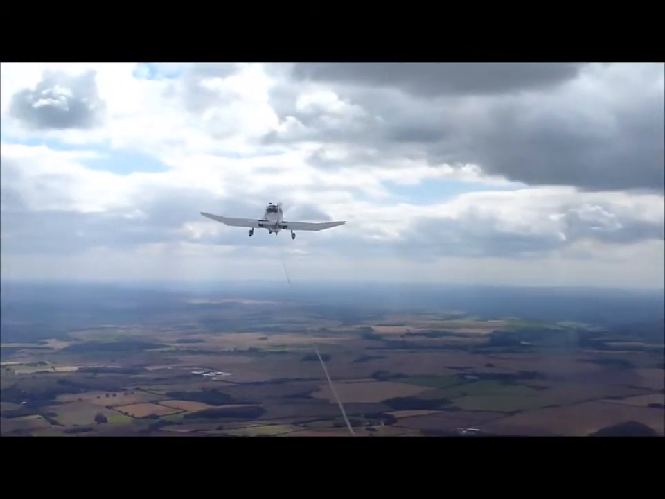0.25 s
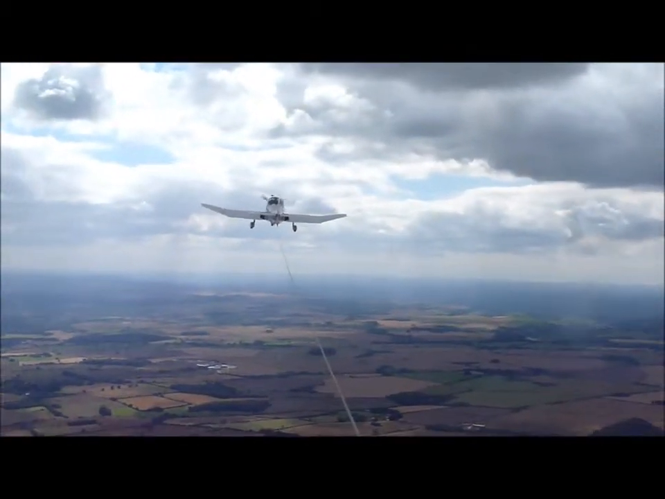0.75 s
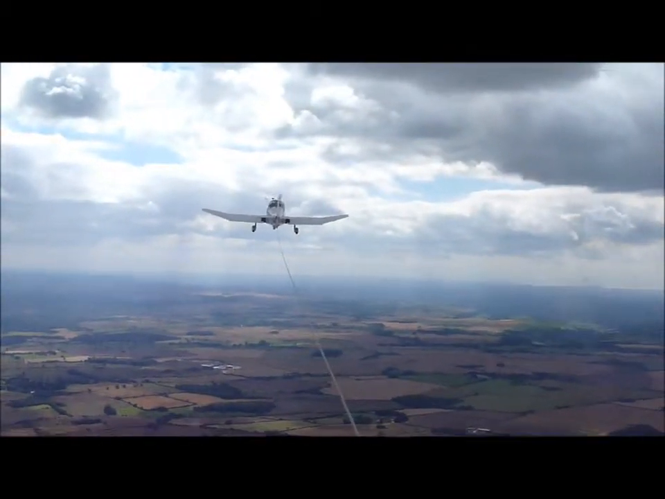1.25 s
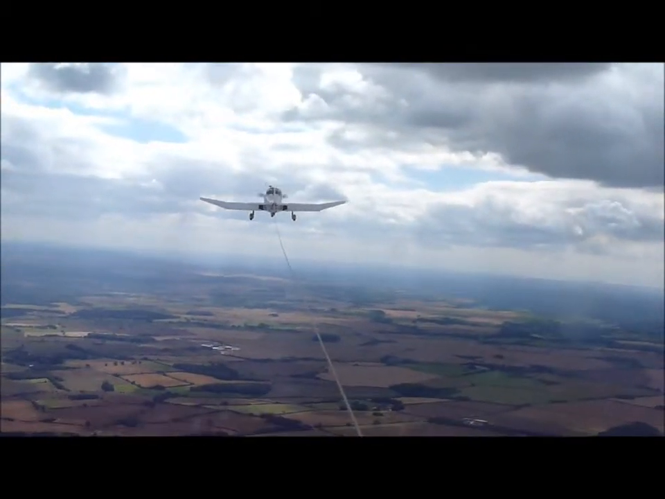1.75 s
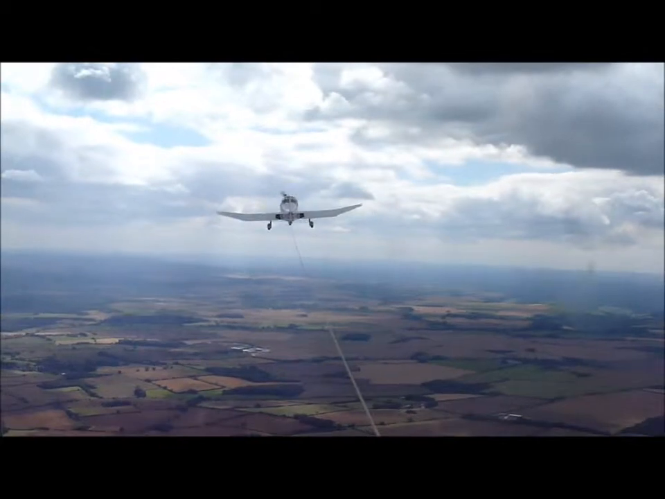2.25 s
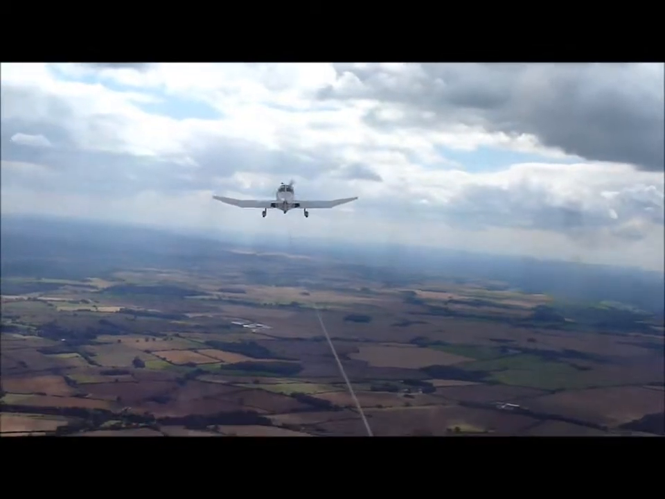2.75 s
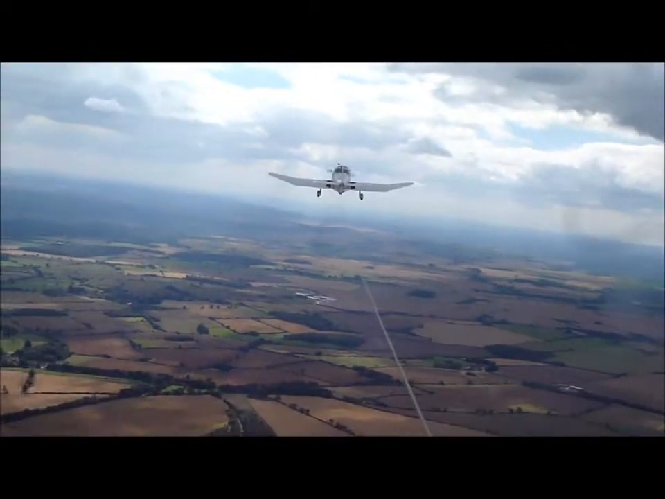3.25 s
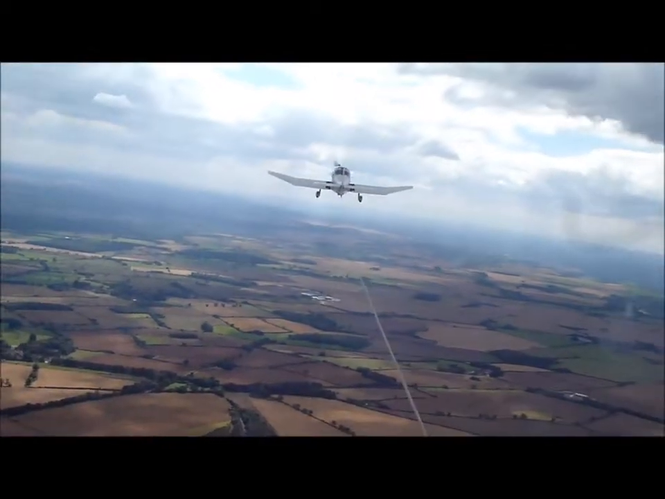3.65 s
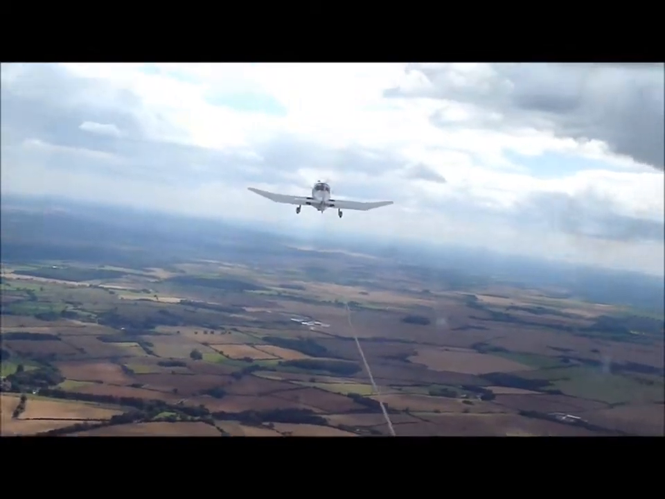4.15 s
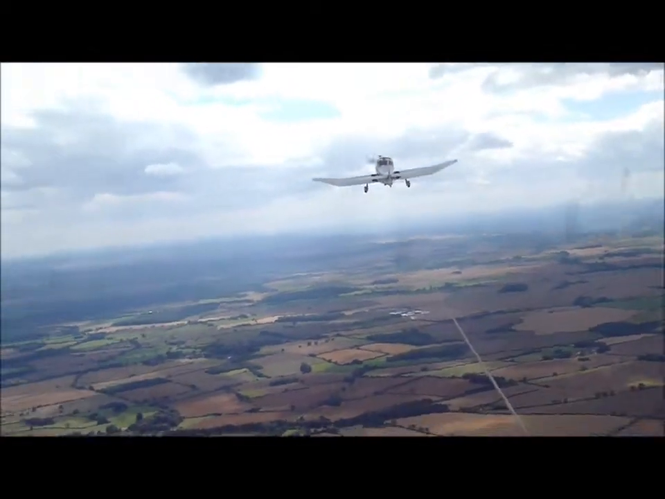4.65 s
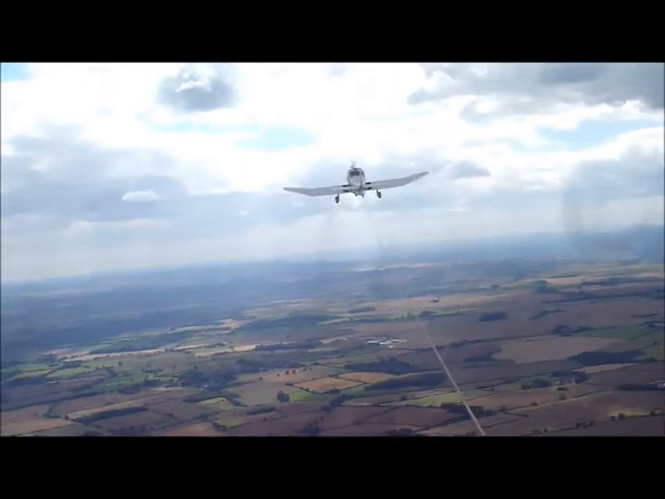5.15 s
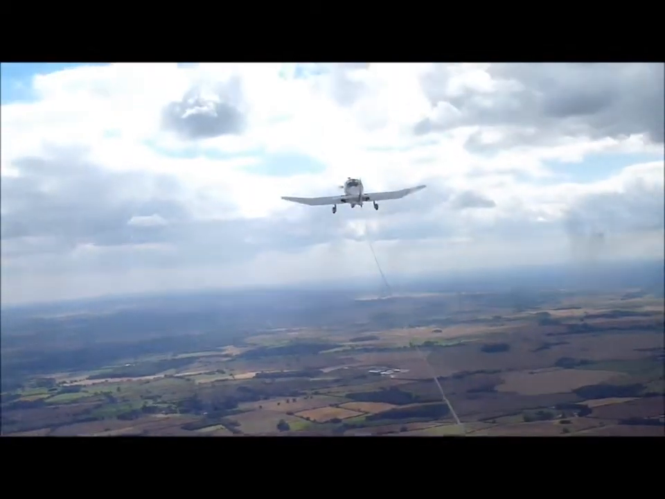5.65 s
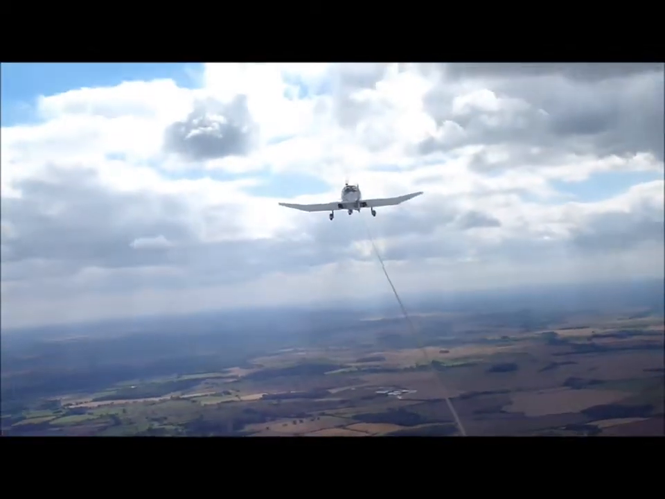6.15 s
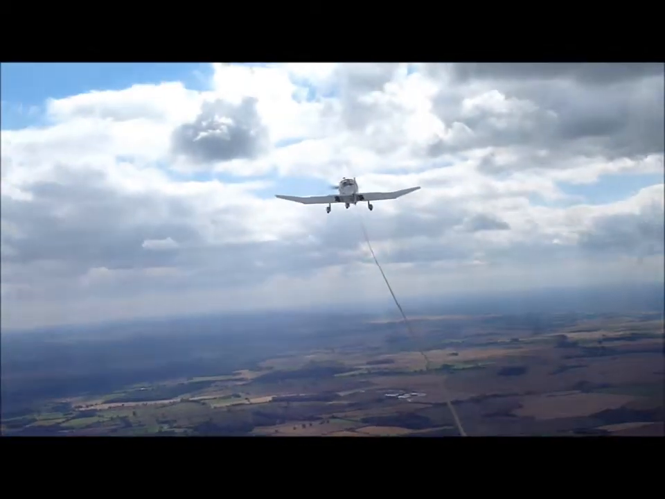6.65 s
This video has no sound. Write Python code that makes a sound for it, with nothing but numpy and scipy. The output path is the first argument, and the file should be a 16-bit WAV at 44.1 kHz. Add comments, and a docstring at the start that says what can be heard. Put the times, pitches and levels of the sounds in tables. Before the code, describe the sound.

Air rushes steadily around a glider under tow, heard from inside the cockpit. A low rumble on the shell blends with a hollow roar, while air leaking at the canopy adds a hiss and a thin, breathy whistle. Small gusts ruffle the sound, and the airframe gives scattered dull thumps that bunch together near the end. The tow plane's engine drones faintly ahead throughout.

```python
"""Inside a glider on aerotow

Turbulent air rumbles on the shell and roars in the hollow cockpit. Air leaking at the canopy
hisses, with a breathy whistle near 2 kHz and its octave. Bumpy air gives the airframe a few
dull thumps, and the tow plane drones faintly ahead."""
import sys
import numpy as np
from scipy import signal
from scipy.fft import rfft, irfft, next_fast_len
from scipy.io import wavfile
from scipy.ndimage import uniform_filter1d, map_coordinates

SR = 44100
rng = np.random.default_rng(int(sys.argv[2]) if len(sys.argv) > 2 else 0)


def digitize_waveform(pressure):
    """Quantize a signal to 16-bit integers and store it at the path in sys.argv[1].

    Rows of a 2-D input are taken as channels; values are limited to [-1, 1].
    """
    field = np.atleast_2d(pressure).T
    bounded = np.clip(field, -1, 1)
    quanta = np.round(bounded * 32767).astype(np.int16)
    wavfile.write(sys.argv[1], SR, quanta)


N = 304731


def amp(db):
    """Decibels to gain."""
    return 10 ** (np.asarray(db) / 20)


def unit(x):
    """Scale to rms 1."""
    return x / np.sqrt(np.mean(x ** 2) + 1e-20)


def curves(rows):
    """One value per sample for each column after the time."""
    times, *columns = np.transpose(rows)
    return [np.interp(np.arange(N) / SR, times, column) for column in columns]


def wobble(rate):
    """A smooth random curve, rate knots a second."""
    return map_coordinates(rng.standard_normal(int(N * rate / SR) + 4), [np.arange(N) * rate / SR])


def filtered(x, response):
    """Filter x by a gain that depends on frequency."""
    size = next_fast_len(N + SR // 2)
    return irfft(rfft(x, size) * response(np.fft.rfftfreq(size, 1 / SR)), size)[:N]


def eq(points):
    """Response through (freq_hz, level_db) points on a log axis."""
    freq_hz, level_db = np.transpose(points)
    return lambda hz: amp(np.interp(np.log(hz + 1), np.log(freq_hz), level_db))


def resonances(modes, colour):
    """Response of independently driven modes, whose powers add, shaped by the response colour."""
    def response(hz):
        power = sum(np.abs(amp(db) * hz * width / (pitch ** 2 - hz ** 2 + 1j * hz * width)) ** 2
                    for pitch, width, db in modes)
        return np.sqrt(power) * colour(hz)
    return response


def turbulence(response, patchy_db):
    """Coloured noise of rms 1 in which passing eddies lift patches of the spectrum."""
    spectrum = signal.stft(rng.standard_normal(N), nperseg=512)[2]
    patches = uniform_filter1d(rng.standard_normal(spectrum.shape), size=7, axis=0)
    patches = uniform_filter1d(patches, size=16, axis=1)
    noise = signal.istft(spectrum * amp(patchy_db * unit(patches)), nperseg=512)[1][:N]
    return unit(filtered(noise, response))


# Fader rides on top of the airflow, hum relative to roar: time_s, rumble_db, roar_db, hum_db
CABIN_RIDES = [(0, -1, 0.1, -19), (1.2, -0.5, -0.5, -18.5), (1.7, -0.9, 0, -14), (2.2, 0.2, -0.1, -9.5),
               (2.8, -0.3, 0.8, -4.5), (3.4, -1.6, 0.7, -5), (4.0, 0, 1.1, -10.5), (5.2, 1.1, -0.4, -8),
               (6.3, 0.4, 0.8, -16), (6.91, 0.5, -1.1, -16)]
# Sub-bass weight of the largest eddies: freq_hz, level_db
SUB_EQ = [(10, -39), (20, -14), (33, -1.5), (55, 1), (82, 0), (110, -9), (200, -36.5), (600, -72)]
# Body of the shell's rumble: freq_hz, level_db
RUMBLE_EQ = [(50, -23.5), (92, -1.5), (120, -0.5), (150, -0.5), (176, 1.5), (212, -1), (245, -6.5),
             (320, -12), (600, -27), (1500, -68)]


def shell_rumble(flow_db, buffet):
    """The boundary layer shakes the shell; the largest eddies come and go on their own."""
    ride_db, _, _ = curves(CABIN_RIDES)
    sub_db = -33.5 + ride_db + 0.37 * flow_db + 1.6 * wobble(9)
    sub = amp(sub_db) * turbulence(eq(SUB_EQ), patchy_db=0)
    body_db = -28.5 + ride_db + 0.85 * flow_db + 0.4 * buffet + 0.5 * wobble(14)
    return sub + amp(body_db) * turbulence(eq(RUMBLE_EQ), patchy_db=0.12)


# Hollow resonances of the cockpit air: pitch_hz, width_hz, level_db
COCKPIT_MODES = [(283, 78, -4), (364.3, 37, 2), (471, 48, -0.5), (607, 80, -6.5), (724, 41, -9),
                 (805, 80, -10.5)]


def cockpit_roar(flow_db, buffet):
    """Turbulence excites the cockpit air into a roar and hum; the shell shuts out the treble."""
    _, ride_db, hum_db = curves(CABIN_RIDES)
    wall = eq([(120, -10.5), (280, 0), (800, 1.5), (1300, -10.5), (4000, -42)])
    roar = turbulence(resonances(COCKPIT_MODES, wall), patchy_db=1.04)
    hum = amp(hum_db) * turbulence(resonances([(614, 50, 0)], wall), patchy_db=0.2)
    return amp(-31.6 + ride_db + 0.85 * flow_db + 0.6 * buffet) * (roar + hum)


# Fader rides on the leak, on top of the airflow: time_s, hiss_db, whistle_db
LEAK_RIDES = [(0, 0, -1), (1.3, .1, 0.5), (1.6, 0.2, 0), (2.3, 0, 0.5), (2.8, -0.5, -1.5), (3.7, -1, 0),
              (4.2, -0.8, 1.5), (4.5, -1, -4.5), (4.8, .5, -3), (5.9, 1, -0.2), (6.91, -0.2, 0.7)]
# Broad midrange rush of the jet: freq_hz, level_db
RUSH_EQ = [(500, -11), (780, -5), (880, -6), (950, 0), (1010, -2), (1075, 0.5), (1190, -3.5), (1420, -3),
           (1610, 0.5), (1690, -2), (1790, 1), (1880, -1.5), (2130, -3.5), (2450, -16.5), (4000, -56.5)]
# Bright hiss of the jet: freq_hz, level_db
HISS_EQ = [(1500, -29.5), (2250, 0), (2400, -1.5), (2580, 0.3), (2950, -.3), (3500, -4), (3850, -1.5),
           (4320, -0.9), (4650, -7.5), (5300, -10.7), (5750, -16), (6300, -18.7), (7050, -27), (7550, -44)]
# Breathy tones of the canopy gap: pitch_hz, width_hz, level_db
WHISTLE_MODES = [(2001, 54, 0), (4070, 130, -11.8)]


def canopy_leak(flow_db, buffet):
    """A fluttering jet rushes and hisses through the canopy gap, which favours two whistling tones."""
    hiss_db, whistle_db = curves(LEAK_RIDES)
    jet_db = flow_db + 0.38 * buffet + 0.45 * wobble(12)
    rush = amp(-34 + jet_db) * turbulence(eq(RUSH_EQ), patchy_db=0.13)
    hiss = amp(-39 + 0.9 * jet_db + hiss_db) * turbulence(eq(HISS_EQ), patchy_db=0.45)
    gap = eq([(1000, -22.5), (1900, 3), (2100, 1), (2500, -5), (3500, -12.5),
              (4000, 5), (4200, -2), (5000, -6.5), (7500, -32.5)])
    tones = turbulence(resonances(WHISTLE_MODES, gap), patchy_db=0.5)
    whistle = amp(-39 + 0.93 * jet_db + whistle_db + 0.6 * wobble(14)) * tones
    return rush + hiss + whistle


# Dull knocks of the airframe: start_s, level_db, pitch_hz
JOLTS = [(0.445, -16, 189), (1.158, -23, 100), (2.14, -18, 145), (2.800, -11, 190), (3.055, -12, 200),
         (4.281, -18, 131), (5.465, -12, 163), (6.053, -15.5, 161), (6.184, -19, 130), (6.393, -13, 125),
         (6.394, -10, 354), (6.41, -18, 165), (6.459, -13.5, 160), (6.695, -19, 262)]


def airframe_thumps(rise_cycles=0.56):
    """Each jolt flexes the airframe for a cycle or two."""
    out = np.zeros(N + SR)
    t = np.arange(SR // 10) / SR
    for start_s, level_db, pitch_hz in JOLTS:
        age = t * pitch_hz / rise_cycles
        envelope = amp(level_db) * (age * np.exp(1 - age)) ** 2
        out[round(start_s * SR):][:len(t)] += envelope * np.sin(2 * np.pi * pitch_hz * t)
    return out[:N]


# Partials of the tow plane's exhaust: firing_multiple, level_db
EXHAUST_HARMONICS = [(1, 1), (2, -6), (3, -8), (4, -6.5), (5, -13.5), (6, -12)]


def tow_plane(firing_hz=121.5, level_db=-44, waver=0.016, fading_db=3):
    """The exhaust drone wavers and fades on its way through the propeller's wake."""
    phase = 2 * np.pi * np.cumsum(firing_hz * (1 + waver * wobble(12))) / SR
    drone = sum(amp(db + fading_db * wobble(7)) * np.sin(multiple * phase + rng.uniform(0, 2 * np.pi))
                for multiple, db in EXHAUST_HARMONICS)
    return amp(level_db) * unit(drone)


# Slow drift of the wind against a steady tow: time_s, level_db
WIND_DRIFT = [(0, -0.8), (.85, -0.3), (1.3, 0.74), (1.68, 2), (1.85, 0.23), (2.8, 1), (4.1, -0.2),
              (4.8, 1.3), (5.2, -0.5), (5.8, 0.1), (6.3, -.6), (6.91, -1.1)]
# Gusts (+) and lulls (-) of bumpy air: centre_s, length_s, canopy_db, shell_db
WIND_SWELLS = [(0.844, 0.084, 1, -4), (1.166, 0.12, 0, 1.5), (1.743, .06, 2.3, 2.5), (1.967, .08, 3, 3),
               (2.167, 0.1, -0.5, 4), (2.48, 0.14, -2.7, 0), (3.026, .09, 2.5, 3.5), (3.47, .14, 2.7, 2.5),
               (4.254, 0.16, 2.5, 2), (4.41, .22, -2, -3), (4.682, 0.4, 0.4, 0.5), (5.054, 0.28, 0.5, -2.5),
               (5.447, 0.13, 1.8, 3.5), (5.67, 0.11, .4, 4), (5.993, 0.065, -3.5, -5.5),
               (6.196, 0.043, 2.5, 6.5), (6.246, 0.11, -2.5, -4), (6.362, 0.17, -2, -4),
               (6.70, 0.065, 1.5, 3), (6.78, 0.059, -0.5, -1.5)]


def airflow():
    """Wind strength in dB at the canopy and on the shell: gusts and lulls ride on a slow drift."""
    flow_db, = curves(WIND_DRIFT)
    t = np.arange(N) / SR
    for centre_s, length_s, *peaks_db in WIND_SWELLS:
        swell = np.cos(np.pi * np.clip((t - centre_s) / length_s, -0.5, 0.5)) ** 2
        flow_db = flow_db + np.outer(peaks_db, swell)
    return flow_db


def scene():
    """One airflow and its buffeting drive all the wind layers; thumps and drone join them in mono."""
    canopy_db, shell_db = airflow()
    buffet = wobble(35)
    wind = shell_rumble(shell_db, buffet) + cockpit_roar(shell_db, buffet)
    wind += canopy_leak(canopy_db, buffet)
    return (wind + tow_plane() + airframe_thumps())[None]


def record(dry, top_hz=7650):
    """A brick-wall low-pass takes off the top end."""
    return np.array([filtered(channel, lambda hz: hz < top_hz) for channel in dry])


dry = scene()
out = record(dry)
digitize_waveform(out)
```